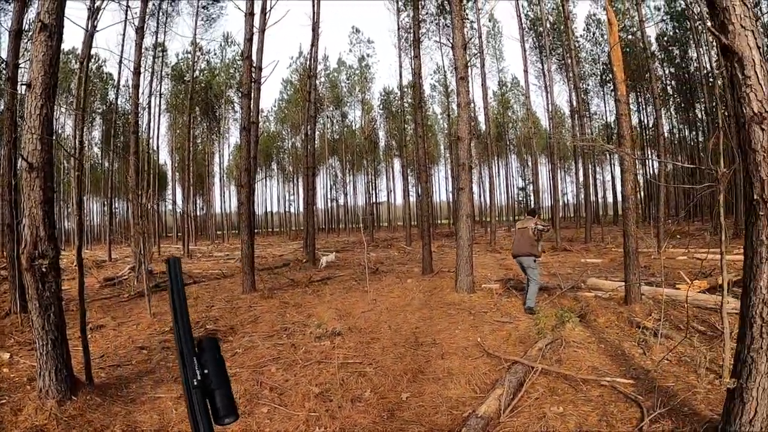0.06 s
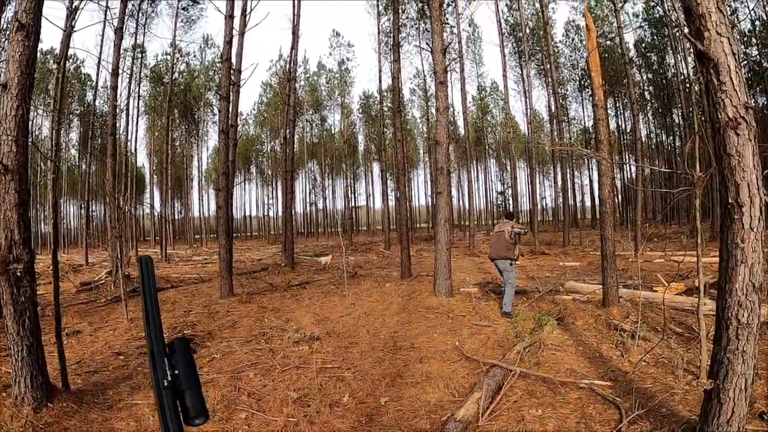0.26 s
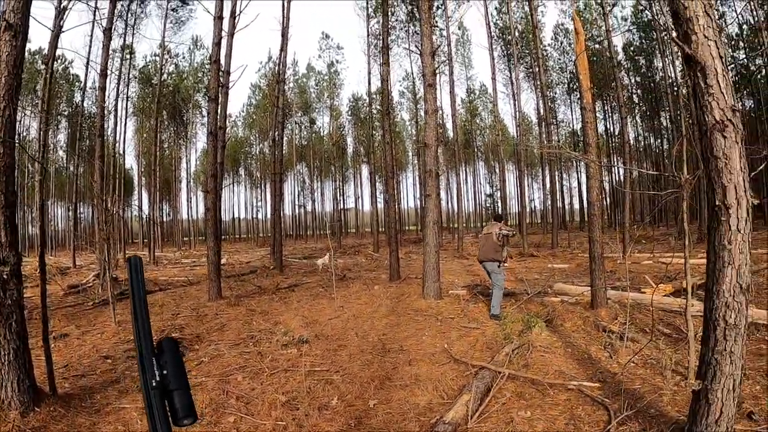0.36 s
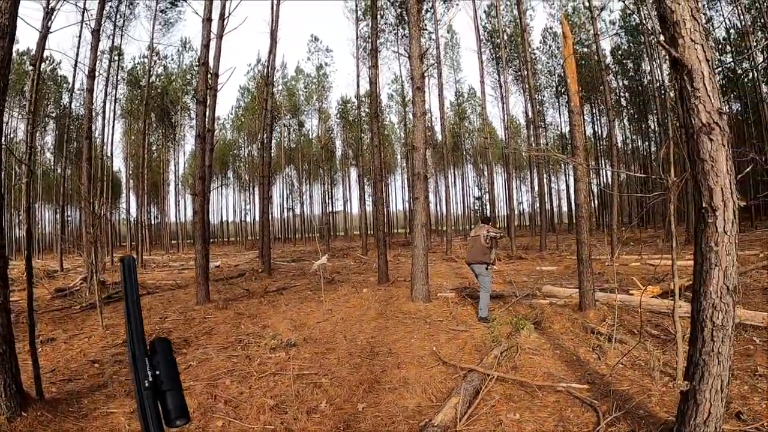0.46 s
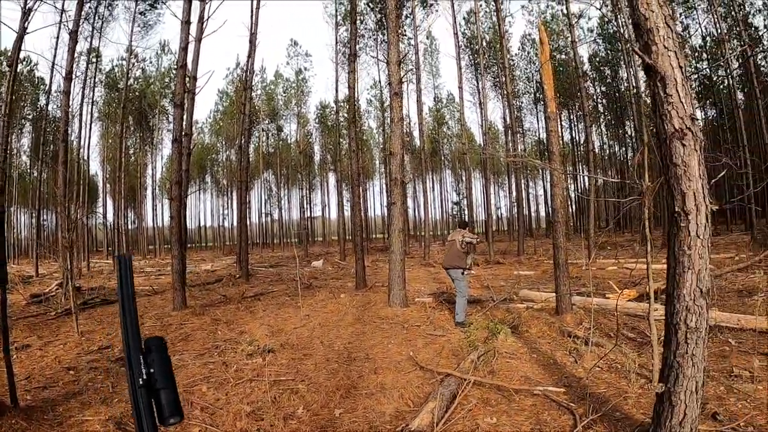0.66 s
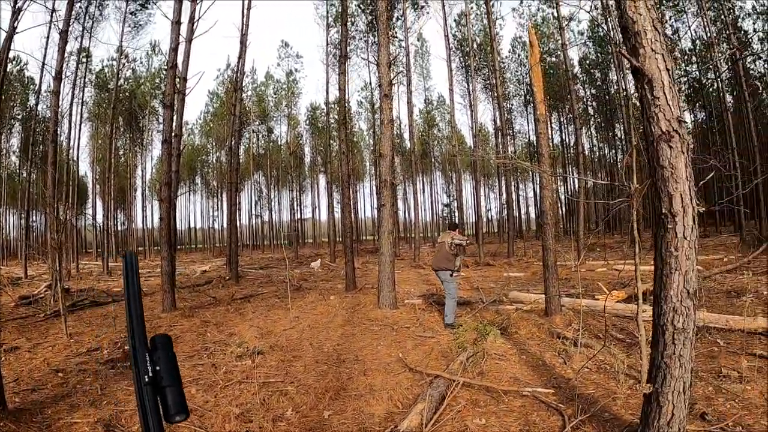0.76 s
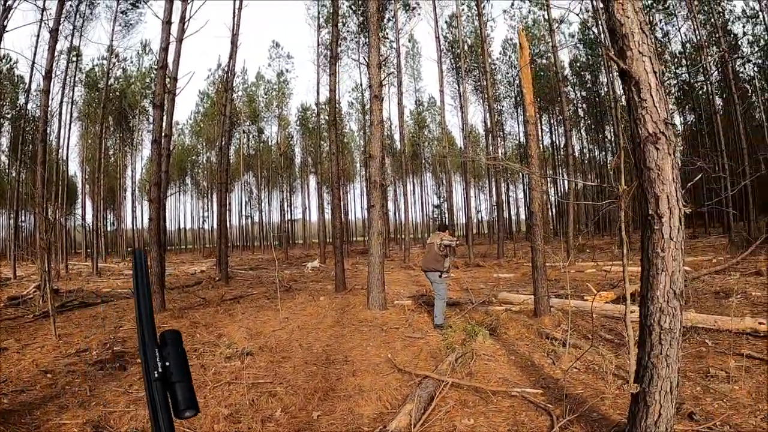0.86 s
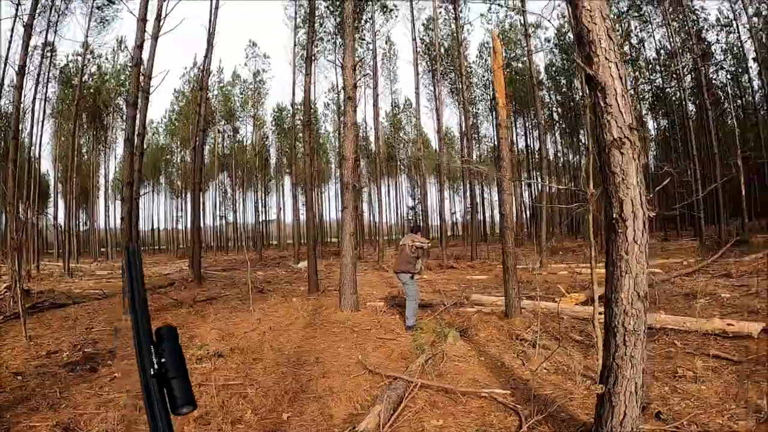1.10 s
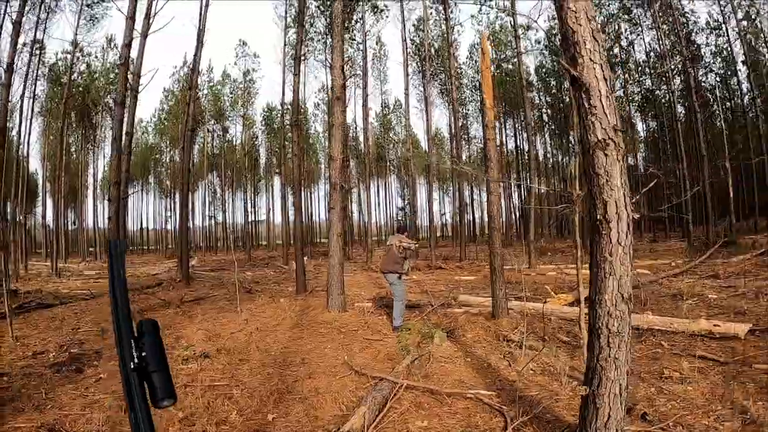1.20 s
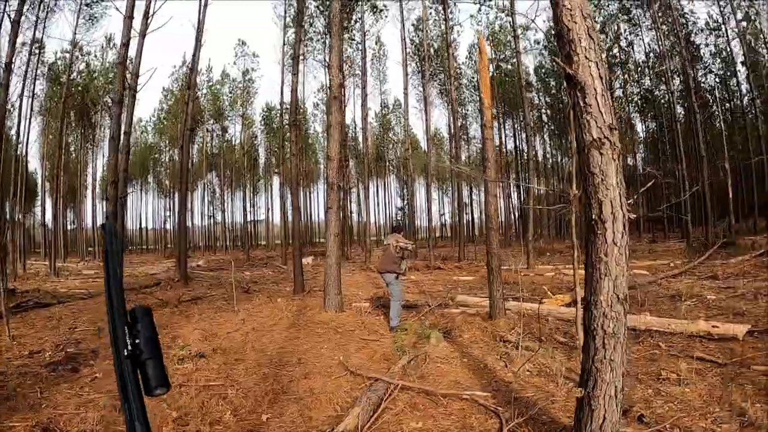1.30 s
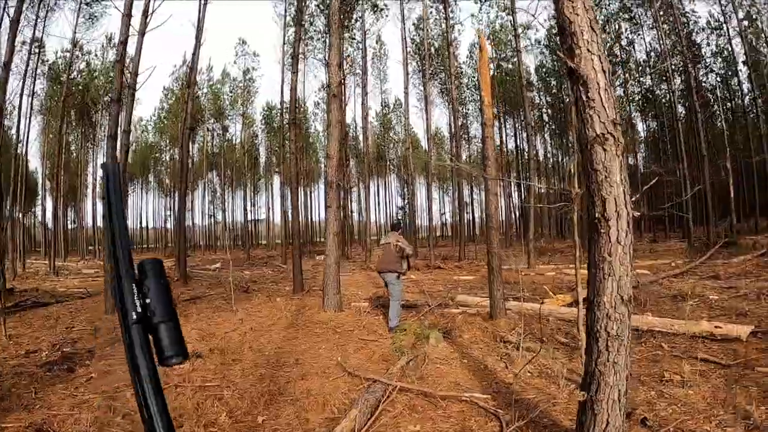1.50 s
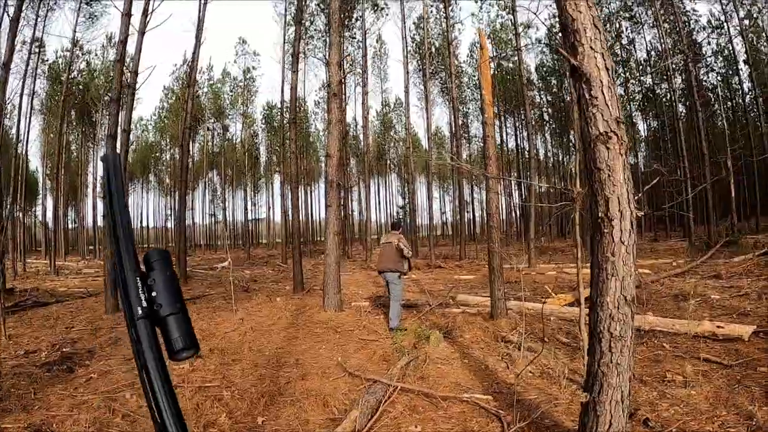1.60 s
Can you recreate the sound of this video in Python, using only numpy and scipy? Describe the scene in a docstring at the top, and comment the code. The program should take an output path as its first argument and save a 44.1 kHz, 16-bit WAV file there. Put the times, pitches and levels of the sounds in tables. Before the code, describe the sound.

A shotgun fires twice, about half a second apart, a few metres from the microphone in a pine wood. Light wind and soft gear bumps come first; each sharp blast leaves a rolling echo that dulls and fades.

```python
"""Two shotgun blasts in a pine wood, heard from a few metres away.
First, wind nudges the microphone, with soft bumps and small clicks of gear. A brief metallic ring
swells, then the first blast cracks and thumps. Near trunks slap it back, and the whole wood
scatters it into a rolling echo that dulls as it fades. About half a second after the first blast,
a brief metallic ring swells again, then a second blast cracks and rolls away."""
import sys
import numpy as np
from scipy import signal
from scipy.fft import rfft, irfft
from scipy.io import wavfile
from scipy.ndimage import uniform_filter1d

SR = 44100
rng = np.random.default_rng(int(sys.argv[2]) if len(sys.argv) > 2 else 0)


def store_pcm(level_fs):
    """Save levels as 16-bit WAV."""
    pcm = np.round(np.clip(level_fs, -1, 1) * 32767).astype(np.int16)
    wavfile.write(sys.argv[1], SR, np.atleast_2d(pcm).T)


N = 72765
T = np.arange(N) / SR
FREQS = np.maximum(np.arange(N + 1) * SR / (2 * N), 1)

# Tone of the wind (a spectrum sets only the balance of low and high): f/Hz, level/dB
WIND_SPECTRUM = [(20, -1), (55, -7), (130, -3.5), (250, -19.5), (600, -18.5), (1000, -27.5), (2500, -41),
                 (5000, -47), (9000, -49.5), (11000, -62), (15500, -80)]
# Wind dying down: t/s, level/dB
WIND_LEVELS = [(0, -32.5), (0.19, -34.5), (0.6, -43), (1.65, -44)]
# Soft bumps on the microphone: t/s, level/dB, f/Hz
SOFT_BUMPS = [(0.022, -19.5, 58.5), (0.106, -21, 60.3)]
# Clicks and squeaks of gear: t/s, level/dB, f/Hz, decay/s
GEAR_CLICKS = [(0.0790, -43, 2270, 0.0047), (0.0905, -49, 5900, 0.0022), (0.1850, -30.5, 2590, 0.0019),
               (0.192, -34, 2190, .003), (0.2007, -40, 3640, .002), (1.588, -49, 5550, 0.0028)]
# Ring heard before each blast: start t/s, end t/s, tone level/dB, hiss level/dB
RING_SWELLS = [(0.2, 0.241, -12, -21.5), (0.769, 0.8, -21, -37)]
# Pure tones in the ring, one list per ring: f/Hz, relative level/dB
RING_TONES = [
    [(1270, -7.5), (1360, 3), (1462, -5.5), (2116, -16), (3897, -9), (5486, -21), (5857, -20), (6335, -25),
     (7000, -19), (7176, -26), (7730, -16), (8204, -18), (8387, -20), (8952, -20), (11210, -29)],
    [(1270, 3.5), (2293, -1), (2900, 1), (4651, -11), (6330, -7.5), (6417, -6.5), (6977, -12.5),
     (8969, -16), (10524, -25)],
]
# Hiss in the ring: f/Hz, level/dB
HISS_SPECTRUM = [(200, 17), (900, -31), (1500, 13), (2800, -1), (5000, 8), (8500, -2), (10000, -9),
                 (13000, -18), (15500, -32)]
# Sharp shock fronts as each blast begins: t/s, level/dB, length/s
SHOCK_FRONTS = [(0.24, -2, 0.0012), (0.243, -1.5, 0.00067), (0.8016, 1.5, 0.00039), (0.8043, 4.5, 0.00063)]
# The shots: t/s, crack level/dB, thump level/dB, thump f/Hz, thump decay/s, boom level/dB
SHOTS = [(0.2442, -3, -5, 298, .008, -11.5), (0.8036, -11, -2.5, 370, 0.0015, -8)]
# Crack of the gas: f/Hz, level/dB
CRACK_SPECTRUM = [(100, -8), (400, -11), (900, -31), (1600, 13), (2800, -2), (5000, -7), (8000, -12.5),
                  (11000, -24), (15500, -35)]
# Rise and fall of the echo, one list per blast: t/s after the blast, relative level/dB
ECHO_LEVELS = [
    [(0.01, -4.5), (0.06, -6.5), (0.10, -1.5), (0.18, -2.5), (0.22, 1.5), (0.27, 5), (0.33, 2), (0.41, 0),
     (0.52, -2), (0.68, -18), (0.86, -8), (1.4, -30)],
    [(0.01, -4), (0.04, -7.5), (0.11, -4.5), (0.16, -3), (0.20, 0), (0.27, 0), (0.33, -1), (0.41, -2),
     (0.53, -2), (0.68, -4.5), (0.86, -9.5)],
]
# Echo before the air dulls it: f/Hz, level/dB
ECHO_SPECTRUM = [(60, -24), (280, -23.5), (480, -2.5), (900, 1.5), (1400, -2), (2200, -3.5), (3300, -9.5),
                 (5000, -16), (8500, -23), (11000, -34), (15500, -42)]
# Low roll along the ground: f/Hz, level/dB
ROLL_SPECTRUM = [(25, -20), (60, -7), (100, -2.5), (140, 4), (200, -3.5), (270, -14), (360, -3),
                 (600, -13.5), (1500, -34), (15000, -76)]
# Slaps off near trunks and the ground: t/s, front level/dB, spray level/dB, thump level/dB, thump f/Hz
NEAR_SLAPS = [(0.2608, -4, -10, -9, 345), (0.288, -31, -19, -28, 240), (0.2944, -20, -17, -9, 304),
              (0.3160, -15, -16.5, -0.5, 390), (0.319, -11, -14, -10.5, 192), (0.332, -16, -15, -15, 200),
              (0.4520, -17, -16.5, -24, 600), (0.8211, -12, -21, -4, 324), (0.8470, -17, -18, -13, 457),
              (0.853, -20, -14, -8, 305), (0.8751, -7, -15, -8, 151), (0.8833, -9, -25, -33, 464),
              (0.8936, -4, -15, -25, 513), (0.9400, -6.5, -26.5, -24, 400), (0.9503, -6, -27, -24, 480),
              (0.9900, -14, -24, -26, 500), (1.0400, -7.5, -18, -30, 510), (1.0668, -18, -38, -33, 484),
              (1.0740, -17, -12.5, -33, 600)]
# Spray of noise in a slap: f/Hz, level/dB
SPRAY_SPECTRUM = [(100, -22), (500, 9.5), (1400, 3), (2800, -0.5), (5000, -12.5), (8000, -22.5),
                  (11000, -26), (15500, -62)]
# Booms off the ground and the nearest trees: middle t/s, level/dB, f/Hz, half width/s
LOW_BOOMS = [(0.295, -14, 170, 0.0074), (0.326, -19, 146, 0.015), (0.371, -20, 191, 0.021),
             (0.517, -26, 147, 0.018), (0.885, -14.5, 133, 0.011), (0.907, -22.5, 147, .014)]
# Difference between the ears: f/Hz, level/dB compared with the sound they share there
EAR_BANDS = [(40, -39), (150, -58), (500, -52), (1200, -61), (2600, -41), (5000, -25), (9000, -29),
             (14500, -5.5)]


def amp(db):
    """Turn decibels into a gain."""
    return 10 ** (np.asarray(db) / 20)


def unit(x):
    """Scale to an average (rms) level of 1."""
    return x / np.sqrt(np.mean(x ** 2))


def shape(x, gain):
    """Filter with one gain for each frequency."""
    return irfft(rfft(x, 2 * N) * gain)[:N]


def gains(spectrum):
    """Join (f/Hz, level/dB) points into one gain for each frequency."""
    hz, db = np.array(spectrum).T
    return amp(np.interp(np.log(FREQS), np.log(hz), db))


def colour(x, spectrum):
    """Filter x by a spectrum and scale it to level 1."""
    return unit(shape(x, gains(spectrum)))


def band(hz, octaves):
    """Gains that keep only the frequencies near hz."""
    return np.exp(-(np.log2(FREQS / hz) / octaves) ** 2)


def noise():
    """White noise."""
    return rng.standard_normal(N)


def waver(hz):
    """A random wobble, mostly slower than hz."""
    return unit(shape(noise(), np.exp(-(FREQS / hz) ** 2)))


def fall(start, decay):
    """Start at once, then die away."""
    return (T >= start) * np.exp(-np.maximum(T - start, 0) / decay)


def thump(start, hz, decay):
    """A pressure swing that dies in a few cycles."""
    return fall(start, decay) * np.sin(2 * np.pi * hz * (T - start))


def front(start, length):
    """A shock wave shaped like an N: the pressure jumps, slides below normal and jumps back."""
    u = 2 * (T - start) / length - 1
    return -u * np.exp(-u ** 4 / 2)


def burst(start, decay, spectrum):
    """A spray of noise that dies quickly."""
    return shape(noise() * fall(start, decay), unit(gains(spectrum)))


def through_air(x, start, db_per_s_khz):
    """The longer a sound has travelled, the more treble it has lost."""
    centres = np.geomspace(50, 16000, 18)
    age = np.maximum(T - start, 0)
    out = 0
    for hz, pick in zip(centres, np.eye(len(centres))):
        part = shape(x, np.interp(np.log(FREQS), np.log(centres), pick))
        out += part * amp(-db_per_s_khz * hz / 1000 * age)
    return out


def wind():
    """Air rumbles on the microphone and dies down."""
    return colour(noise(), WIND_SPECTRUM) * amp(np.interp(T, *np.array(WIND_LEVELS).T))


def handling():
    """Soft bumps shake the microphone, and gear clicks close by."""
    out = sum(amp(db) * thump(start, hz, decay=0.012) for start, db, hz in SOFT_BUMPS)
    for start, db, hz, decay in GEAR_CLICKS:
        out += amp(db) * shape(noise() * fall(start, decay), unit(band(hz, octaves=0.4)))
    return out


def rings(rise_s=0.03, cutoff_s=0.003, waver_db=3.5):
    """A bright, wavering ring swells for a moment and stops as the blast arrives."""
    out = np.zeros(N)
    for (start, end, tone_db, hiss_db), tones in zip(RING_SWELLS, RING_TONES):
        swell = np.clip((T - start) / rise_s, 0, 1) ** 2
        fade = np.exp(-np.maximum(T - end, 0) / cutoff_s)
        ring = 0
        for hz, db in tones:
            level = amp(db + waver_db * waver(hz=120))
            ring += level * np.sin(2 * np.pi * (hz * T + rng.random()))
        hiss = colour(noise(), HISS_SPECTRUM)
        out += swell * fade * (amp(tone_db) * unit(ring) + amp(hiss_db) * hiss)
    return out


def blasts():
    """Each shot makes shock fronts, a crack of rushing gas, a thump and a deep boom."""
    out = sum(amp(db) * front(start, length) for start, db, length in SHOCK_FRONTS)
    for start, crack_db, thump_db, hz, decay, boom_db in SHOTS:
        out += amp(crack_db) * burst(start, decay=0.0034, spectrum=CRACK_SPECTRUM)
        out += amp(thump_db) * thump(start, hz, decay)
        out -= amp(boom_db) * thump(start, hz=70, decay=0.0105)
    return out


def wood_echo(air_db_per_s_khz, levels_db=(-22, -20.5), bounces_per_s=5000, scatter_db=3):
    """Thousands of small, uneven bounces off trunks blur into an echo that swells, fades and dulls."""
    out = np.zeros(N)
    for (start, *_), db, curve in zip(SHOTS, levels_db, ECHO_LEVELS):
        arrivals = rng.random(N) < bounces_per_s / SR
        bounces = arrivals * np.sign(noise()) * amp(scatter_db * noise())
        level = (T > start) * amp(db + np.interp(T - start, *np.array(curve).T))
        out += level * through_air(colour(bounces, ECHO_SPECTRUM), start, air_db_per_s_khz)
    return out


def ground_roll(level_db=-22.5, rise_s=0.024, fall_db_per_s=22.5, waver_db=2.5):
    """The bass of each blast rolls away along the ground, wavering as it fades."""
    out = np.zeros(N)
    for start, *_ in SHOTS:
        age = np.maximum(T - start, 0)
        rise = np.minimum(age / rise_s, 1)
        level = amp(level_db - fall_db_per_s * age + waver_db * waver(hz=18))
        out += rise * level * through_air(colour(noise(), ROLL_SPECTRUM), start, db_per_s_khz=56.5)
    return out


def slaps(air_db_per_s_khz, low_cut_hz=71, high_cut_hz=4900, decay_cycles=0.74):
    """Near trunks and the ground throw back duller blasts: a front, a thump and a spray of noise."""
    knocks, sprays = np.zeros(N), np.zeros(N)
    for start, front_db, spray_db, thump_db, hz in NEAR_SLAPS:
        knocks += amp(front_db) * front(start, length=0.00058)
        knocks += amp(thump_db) * thump(start, hz, decay_cycles / hz)
        delay = min(start - shot for shot, *_ in SHOTS if shot < start)
        decay = 0.0026 + 0.014 * delay  # a longer trip spreads the spray out
        air_loss_db = air_db_per_s_khz * delay * FREQS / 1000
        sprays += shape(burst(start, decay, SPRAY_SPECTRUM), amp(spray_db - air_loss_db))
    soften = 1 / (1 + (FREQS / high_cut_hz) ** 2) / (1 + (low_cut_hz / FREQS) ** 2)
    return sprays + shape(knocks, soften)


def booms():
    """The ground and the nearest rows of trees send the bass back in a few round booms."""
    out = np.zeros(N)
    for middle, db, hz, width in LOW_BOOMS:
        swell = np.exp(-((T - middle) / width) ** 2)
        out += amp(db) * swell * np.sin(2 * np.pi * hz * (T - middle))
    return out


def ear_difference(shared):
    """Faint noise that follows the loudness of each band makes the two ears differ a little."""
    out = np.zeros(N)
    for hz, db in EAR_BANDS:
        gain = band(hz, octaves=0.59)
        power = uniform_filter1d(shape(shared, gain) ** 2, size=1024)
        out += amp(db) * np.sqrt(np.abs(power)) * unit(shape(noise(), gain))
    return out


def scene():
    """Add up all the sounds, almost the same on the left and the right."""
    air_db_per_s_khz = 5.5  # how fast the air takes the treble away
    shared = wind() + handling() + rings() + blasts()
    shared += wood_echo(air_db_per_s_khz) + ground_roll() + slaps(air_db_per_s_khz) + booms()
    side = ear_difference(shared)
    return np.array([shared + side, shared - side])


def record(dry):
    """Round off the loudest peaks and cut the highest treble."""
    ceiling, top_hz = 0.95, 15200
    rounded = dry / (1 + (dry / ceiling) ** 4) ** 0.25
    treble_cut = signal.ellip(8, 0.2, 70, top_hz, fs=SR, output="sos")
    return signal.sosfilt(treble_cut, rounded)


dry = scene()
out = record(dry)
store_pcm(out)
```